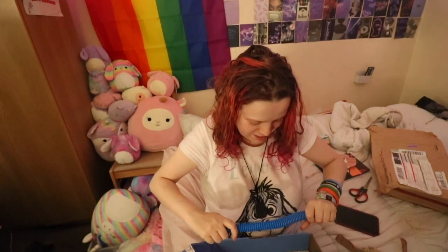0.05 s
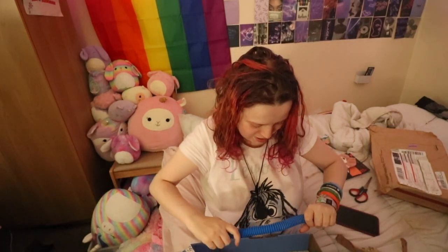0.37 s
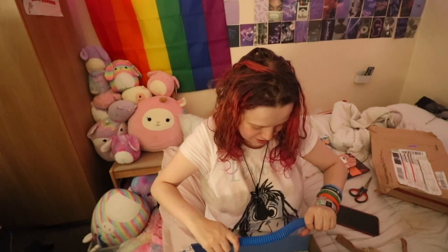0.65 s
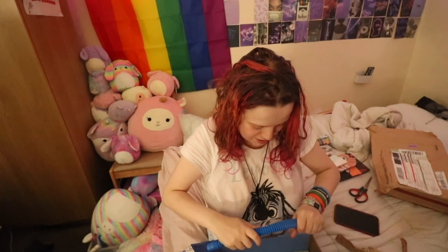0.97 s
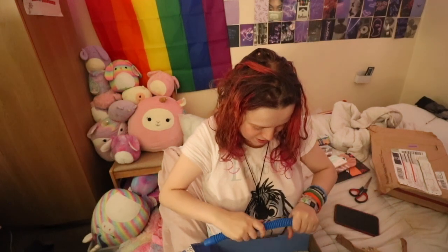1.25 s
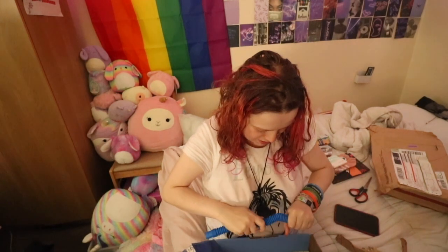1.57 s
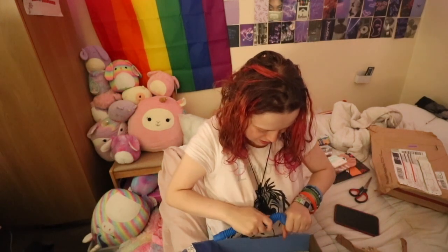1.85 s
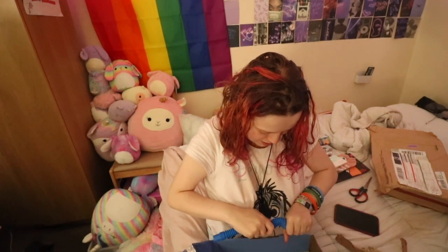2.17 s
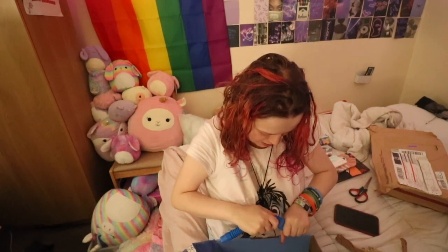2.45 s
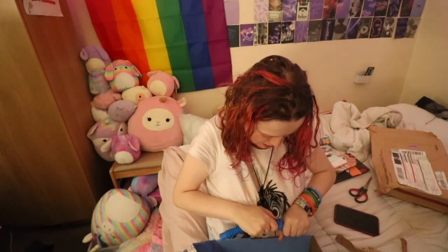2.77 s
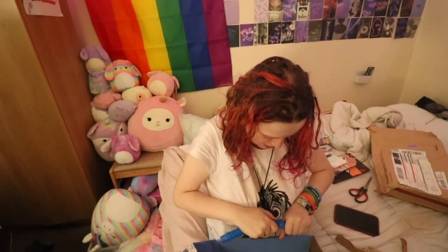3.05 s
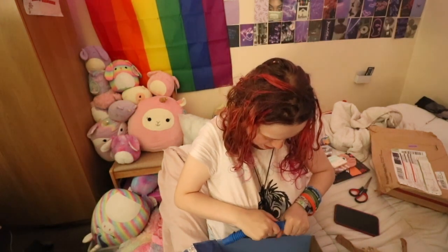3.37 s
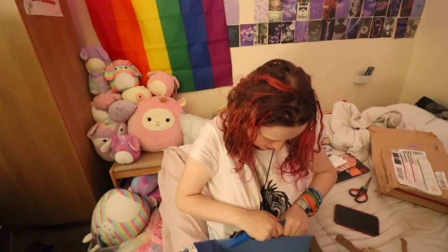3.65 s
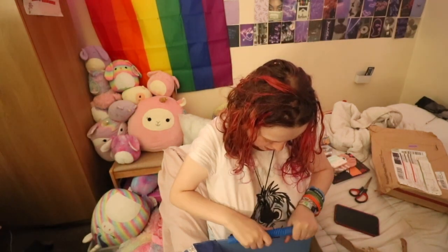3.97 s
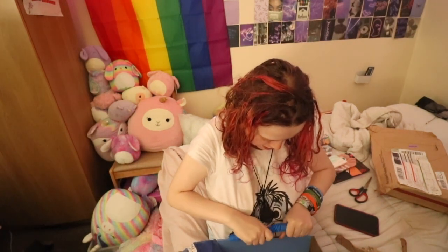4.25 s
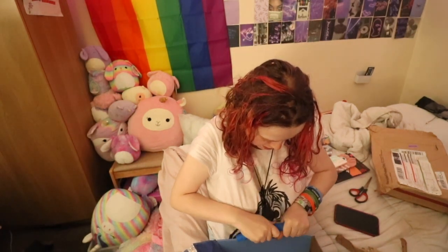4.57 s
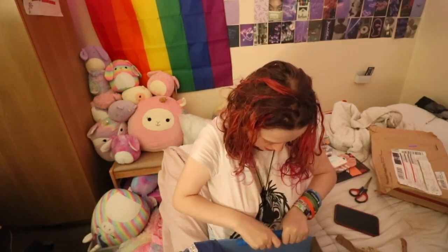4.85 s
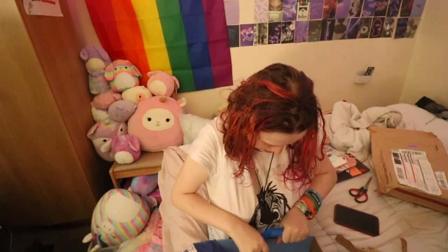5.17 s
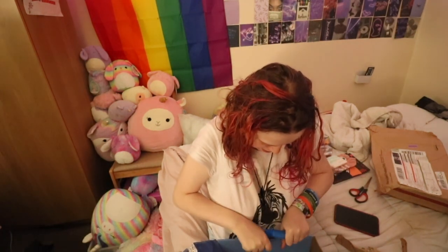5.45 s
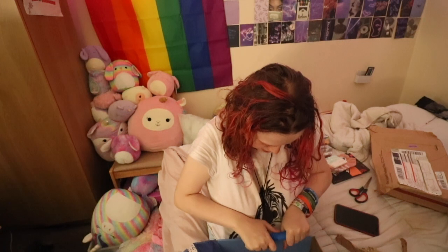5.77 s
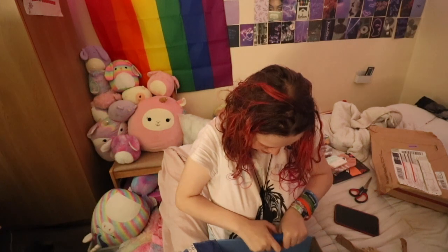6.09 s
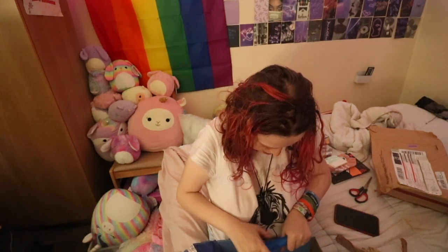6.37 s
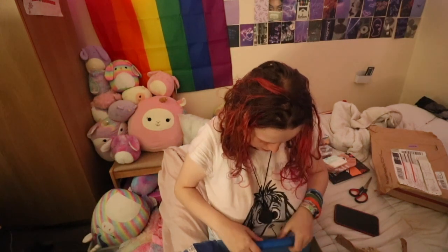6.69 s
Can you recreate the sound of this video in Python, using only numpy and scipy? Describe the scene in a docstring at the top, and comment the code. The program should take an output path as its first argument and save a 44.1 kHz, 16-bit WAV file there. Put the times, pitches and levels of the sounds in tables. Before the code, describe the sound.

Close, hollow plastic pops and clicks come in uneven bursts as a ribbed toy tube is squeezed shorter, over faint room noise.

```python
"""Sharp, hollow pops in quick runs: a ribbed plastic pop tube pushed together by hand in a small bedroom.
Each rib snaps over with a crack, rings the thin wall and thumps the air column, whose pitch climbs
as the tube shortens. Fingers slide on the plastic between pops. The tube is close and the room soft;
behind it lie room air, a deep rumble and a faint swell like far traffic."""
import sys
import numpy as np
from scipy import signal
from scipy.fft import rfft, irfft, next_fast_len
from scipy.io import wavfile

SR = 44100
rng = np.random.default_rng(int(sys.argv[2]) if len(sys.argv) > 2 else 0)


def unload_audio(sound):
    """Save the sound as a 16-bit wav file, at the path given as the first command line argument."""
    columns = np.transpose(np.atleast_2d(sound))
    # keep every value between -1 and 1, then stretch to whole-number steps
    steps = np.round(np.clip(columns, -1, 1) * 32767)
    wavfile.write(sys.argv[1], SR, steps.astype(np.int16))


N = 296528


def tube(into_room=False):
    """Ribs snap in turn; tube length sets the air pitch, the grip sets colour and aim."""
    # one rib a row: t/s, air thump/dB, wall ring/dB, crack/dB
    ribs = [(1.4346, -23.5, -29.5, -21.5), (1.4758, -19.5, -23.5, -18.5), (1.481, -24.5, -29.5, -27.5),
            (1.529, -22, -41, -31), (1.621, -26, -21, -22), (1.6728, -21.5, -50, -33),
            (1.687, -23, -49, -31.5), (1.7141, -24, -37, -31), (1.7349, -29, -33, -29),
            (1.753, -16, -29, -29), (1.766, -11.5, -37, -28), (1.7694, -21.5, -33, -46),
            (1.8224, -19.5, -58, -40.5), (2.2252, -17.5, -42, -40), (2.255, -25.5, -33, -35.5),
            (2.2827, -12.5, -26, -17), (2.2979, -12.5, -23.5, -30), (2.3261, -20, -31.5, -36),
            (2.4119, -19, -44.5, -36.5), (2.7427, -22.5, -25.5, -22.5), (2.9746, -26.5, -30, -27.5),
            (3.039, -25.5, -28, -37.5), (3.1634, -28.5, -29.5, -24), (3.1836, -22.5, -45, -57),
            (3.1887, -26, -29.5, -52), (3.2001, -27, -24, -48), (3.208, -22, -45, -39),
            (3.22, -27.5, -46, -43), (3.235, -26.5, -25.5, -31), (3.422, -29, -22.5, -28),
            (3.4858, -28, -25.5, -41), (3.5141, -22, -25, -39), (3.538, -29.5, -26, -32.5),
            (3.7248, -27, -24.5, -36), (4.2392, -20, -26, -30.5), (4.2892, -32, -72, -51),
            (4.3745, -23.5, -63, -35.5), (4.391, -23, -57, -45), (4.422, -26.5, -26.5, -24),
            (4.4351, -27, -65, -51), (4.5042, -17, -26, -23.5), (4.5064, -24, -32, -29),
            (4.524, -28, -39, -32), (4.5282, -17.5, -31, -29), (4.537, -19.5, -30, -24),
            (4.556, -25, -30, -30), (4.5625, -26.5, -32, -23.5), (4.5694, -27, -23, -26),
            (4.5841, -24, -22.5, -27.5), (4.5953, -21, -29, -31.5), (4.6265, -23, -32, -31.5),
            (4.6355, -22, -30.5, -36), (4.656, -27, -45, -49), (4.6686, -37, -38, -50),
            (4.6885, -21.5, -22, -20.5), (4.7096, -28, -18.5, -26.5), (4.7119, -23.5, -20, -32),
            (4.7243, -45, -26.5, -48), (5.195, -16.5, -25, -21), (5.2096, -15, -26.5, -35),
            (5.2223, -16.5, -31, -28.5), (5.2318, -13.5, -39, -36), (5.2397, -14.5, -34, -32.5),
            (5.2502, -16, -35, -39), (5.701, -32, -39, -40), (5.7302, -16.5, -21.5, -39),
            (5.734, -23.5, -32, -33), (5.7455, -32, -42, -56), (5.7992, -25.5, -27.5, -36),
            (5.8265, -33, -22, -26), (5.8323, -44, -27, -28), (5.8394, -28.5, -25, -39),
            (5.8532, -32, -30, -29), (5.8662, -19, -30, -29.5), (5.8726, -22, -27, -26),
            (5.8899, -14.5, -34, -28.5), (5.902, -40, -26, -40), (5.9166, -27, -31, -36.5),
            (5.9431, -23.5, -38, -43), (5.959, -33, -54, -55), (6.0507, -35.5, -44, -47.5)]
    # one grip a row: start t/s, wall f/Hz, crack f/Hz, knock offset/dB, fizz offset/dB, room send/dB
    grips = [(1.4, 1920, 5960, -12, -3, 3.5), (1.6, 2620, 5070, -10, 2.5, 4),
             (1.65, 1880, 4880, -7.5, -3.5, 4.5), (2.2, 2030, 5050, -12.5, -12, 2),
             (2.7, 2190, 5240, -8.5, -2.5, 2), (2.9, 2180, 3300, -9, -8.5, 1.5),
             (3.4, 2290, 2980, -14.5, -10.5, 1), (3.7, 2340, 4670, -14, -9, -0.5),
             (4.2, 2700, 3340, -13.5, -9, 2), (4.35, 1800, 4360, -9.5, -8, 1.5),
             (4.49, 1880, 5340, -9.5, -3, 3), (4.55, 1930, 3200, -9.5, -4.5, 3),
             (4.58, 2800, 4470, -10, -6, 2), (4.68, 2150, 4740, -17, 0.5, 0.5),
             (5.15, 2090, 5330, -14.5, -1, 4), (5.68, 1554, 3160, -14, -9.5, 1.5),
             (5.81, 2370, 3170, -13.5, -3.5, 4), (5.85, 1790, 5360, -12.5, -7.5, 0.5)]
    # air column pitch, rising as the tube shortens, sinking where it is let out: t/s, f/Hz
    air_pitch = [(1.43, 423.5), (1.75, 452.4), (2.28, 470), (2.74, 484), (3.45, 515), (3.72, 541),
                 (4.52, 567), (4.6, 628), (4.71, 647), (5.22, 612.5), (5.75, 635.5), (6.05, 676)]
    out = np.zeros(N)
    for t_s, thump_db, wall_db, crack_db in ribs:
        grip = max(sum(row[0] <= t_s for row in grips) - 1, 0)
        _, wall_hz, crack_hz, knock_db, fizz_db, send_db = grips[grip]
        air_hz = np.interp(t_s, *np.transpose(air_pitch))
        knock_db += .36 * wall_db + .24 * thump_db
        fizz_db += .76 * crack_db + .34 * thump_db
        snap_s = .0017 * np.exp(.23 * rng.standard_normal())  # fold's travel time round the rib
        crack_hz *= np.exp(.05 * rng.standard_normal())
        sound = pop(air_hz, thump_db, knock_db, wall_hz, wall_db, crack_hz, crack_db, fizz_db, snap_s)
        add(out, t_s, sound * gain_of(send_db if into_room else 0))
    return out


def pop(air_hz, thump_db, knock_db, wall_hz, wall_db, crack_hz, crack_db, fizz_db, snap_s):
    """One rib buckles and sets the wall and the air inside ringing."""
    # air column overtones: pitch ratio, level re snap at that frequency/dB, t60/s
    overtones = [(2.07, -8, 0.057), (3.13, -10.5, 0.024), (4.3, -8.5, 0.037), (5.4, -13.5, 0.03),
                 (6.6, -13.5, 0.041), (7.8, -19.5, 0.025)]
    fold = buckle(snap_s)
    hz = np.linspace(1, SR / 2, len(fold))
    rib_limit = resonance(hz, 10500, q=1.46) / (1j * hz)  # rib cannot follow above its top resonance
    crack_peak = resonance(hz, crack_hz, q=4.5) * resonance(hz, crack_hz, q=1)
    crack = transient(fold * crack_peak * rib_limit, crack_db)
    # tiny creases at the fold's edge fizz a little longer; two resonances in antiphase
    creases = buckle(snap_s * 1.12)
    shimmer = resonance(hz, 14100, q=2.2) - 2 * resonance(hz, 7770, q=9.1)
    fizz = transient(creases * shimmer * high_pass(hz, 8100), fizz_db)
    knock = transient(fold * resonance(hz, 1188, q=1) ** 2 * high_pass(hz, 250), knock_db)
    wall_t60_s = np.interp(wall_db - crack_db, [0, 9], [.005, .016])  # dull snaps ring longer
    wall = transient(fold * ring(hz, wall_hz, wall_t60_s) * resonance(hz, wall_hz, q=1), wall_db - 3.5)
    # the volume step thumps the air column; open ends radiate little bass
    push = high_pass(hz, 350) / (1 + 1j * hz / 1500) ** 2
    air = transient(push * ring(hz, air_hz, t60_s=.046), thump_db - .8)
    snap_colour = [(1100, knock_db), (2200, wall_db), (5000, crack_db)]
    for ratio, db, t60_s in overtones:
        tone_hz = air_hz * ratio * rng.uniform(.94, 1.01)
        tone = fold * ring(hz, tone_hz, t60_s) * resonance(hz, tone_hz, q=1)
        air += transient(tone, interp_log_f(snap_colour, tone_hz) + db)
    return crack + fizz + knock + wall + air


def buckle(snap_s, size=2304):
    """Force spectrum of a fold running round a rib: a short, ragged, nearly white burst."""
    t_s = np.arange(size) / SR
    envelope = (1 - np.exp(-t_s / .00008)) * np.exp(-(t_s / snap_s) ** 2)
    ragged = rfft(rng.standard_normal(size) * envelope)
    whitened = irfft(ragged / abs(ragged))
    return rfft(whitened * np.sqrt(envelope))


def fingers():
    """Skin slides over plastic with a faint, grainy hiss and squeaks once."""
    # finger slides: start t/s, length/s, level/dB
    slides = [(0.697, 0.13, -55), (0.805, 0.18, -54.5), (1.004, 0.21, -55.5), (2.06, 0.31, -60),
              (3.815, 0.24, -55), (4.878, 0.2, -56.5)]
    # friction spectrum: f/Hz, level/dB
    slide_colour = [(1500, -14), (3000, -2), (4300, -3.5), (5500, 1.5), (8000, -1), (13000, -3),
                    (16000, -6)]
    out = np.zeros(N)
    for t_s, length_s, db in slides:
        size = round(length_s * SR)
        grain = gain_of(2 * noise([(30, -2), (150, -6), (600, -50)], size))
        hiss = noise(slide_colour, size) * grain
        add(out, t_s, gain_of(db) * hiss * signal.windows.tukey(size, .7))
    start_s, squeak_s, squeak_hz, squeak_db = .762, .022, 4220, -50
    squeak = band(rng.standard_normal(round(squeak_s * SR)), squeak_hz - 150, squeak_hz + 150)
    add(out, start_s, gain_of(squeak_db) * squeak / squeak.std() * np.hanning(len(squeak)))
    return out


def reflections(x):
    """Close surfaces throw back mids and treble."""
    # echoes off lap, body and wall: delay/s, level/dB
    echoes = [(.0027, -18), (.0056, -24), (.0079, -22), (.0105, -29.5), (0.0154, -23.5), (.0183, -23)]
    out = np.zeros(N)
    bright = band(x, 1600, 12000, order=1)
    for delay_s, db in echoes:
        add(out, delay_s, gain_of(db) * bright)
    return out


def room_tail(x):
    """Sparse random reflections; each band decays at its own rate."""
    # tail decay: f/Hz, t60/s
    tail_t60 = [(350, 0.054), (600, 0.23), (1700, 0.24), (5000, 0.34), (12000, 0.26)]
    # tail gain: f/Hz, level/dB
    tail_colour = [(200, 4.5), (500, -8), (1000, -10), (1600, -7), (2300, -12), (4000, -11.5),
                   (6500, -10.5), (11000, -7), (16000, -15)]
    size, taps_per_s = SR // 2, 4000
    taps = rng.choice([-1., 1.], size) * (rng.random(size) < taps_per_s / SR)
    taps *= np.clip((np.arange(size) / SR - .003) / .0029, 0, 1)  # 3 ms gap, then fade-in
    hz, t_s, bands = signal.stft(taps, SR, nperseg=256)
    decay = gain_of(-60 * t_s / interp_log_f(tail_t60, hz)[:, None])
    energy = (decay ** 2).mean(1, keepdims=True) * np.sum(taps ** 2)
    gain = gain_of(interp_log_f(tail_colour, hz))[:, None] / np.sqrt(energy)
    _, response = signal.istft(bands * decay * gain, SR, nperseg=256)
    return signal.fftconvolve(x, response)[:N]


def background():
    """Steady room air, building rumble and a swell like far traffic with a thin whine in it."""
    # room air spectrum: f/Hz, level/dB
    air_colour = [(18, -7), (45, -6.5), (70, -4), (100, -12), (135, -3.5), (196, 1), (300, -3), (450, -2),
                  (850, -5), (1200, -8.5), (2000, -16), (3500, -22), (7000, -27), (16000, -29)]
    # building rumble: t/s, level/dB
    rumble_level = [(0, -60), (1.15, -56.5), (1.5, -66), (2.3, -57), (3.3, -62), (4.65, -61), (5.1, -50),
                    (5.6, -58), (6.72, -62)]
    # traffic swell: t/s, level/dB
    traffic_level = [(0, -90), (2.8, -63), (3.6, -51.5), (5.5, -46.5), (6.72, -49.5)]
    # traffic spectrum: f/Hz, level/dB
    traffic_colour = [(40, -12), (100, -17), (170, 5), (300, 3), (600, 0.5), (1200, -3), (2000, -7.5),
                      (3500, -14), (7000, -19.5), (14000, -35)]
    rumble_colour = [(12, -35.5), (24, -10), (29, 3), (35, -14), (55, -32), (200, -90)]  # f/Hz, level/dB
    air = gain_of(-47) * noise(air_colour, N)
    rumble = gain_curve(rumble_level) * noise(rumble_colour, N)
    traffic = gain_curve(traffic_level) * noise(traffic_colour, N)
    peak_db, peak_s, half_width_s = -55.5, 4.9, 1
    whine_gain = gain_of(peak_db) / (1 + ((np.arange(N) / SR - peak_s) / half_width_s) ** 2)
    whine = band(rng.standard_normal(N), 1184, 1196)
    return air + rumble + traffic + whine_gain * whine / whine.std()


def transient(spectrum, db):
    """Waveform of a spectrum, with rms level db over its first 5 ms."""
    x = irfft(spectrum)
    return gain_of(db) * x / np.sqrt(np.mean(x[:round(.005 * SR)] ** 2) + 1e-20)


def resonance(hz, centre_hz, q):
    """Complex response of one resonance, gain 1 at centre."""
    return 1 / (1 + 1j * q * (hz / centre_hz - centre_hz / hz))


def ring(hz, centre_hz, t60_s):
    """Resonance set by its decay time."""
    return resonance(hz, centre_hz, np.pi * centre_hz * t60_s / np.log(1000))


def high_pass(hz, edge_hz):
    """Complex response of a second-order high-pass."""
    s = 1j * hz / edge_hz
    return s ** 2 / (1 + np.sqrt(2) * s + s ** 2)


def band(x, lo_hz, hi_hz, order=2):
    """Causal band-pass."""
    return signal.sosfilt(signal.butter(order, [lo_hz, hi_hz], "band", fs=SR, output="sos"), x)


def noise(colour, size):
    """Unit-rms noise; colour rows: f/Hz, level/dB."""
    padded = next_fast_len(size, real=True)
    gain = gain_of(interp_log_f(colour, np.fft.rfftfreq(padded, 1 / SR)))
    x = irfft(rfft(rng.standard_normal(padded)) * gain, padded)[:size]
    return x / x.std()


def interp_log_f(points, hz):
    """Interpolates (f/Hz, value) rows over log frequency."""
    points_hz, values = np.transpose(points)
    return np.interp(np.log(hz + 1), np.log(points_hz + 1), values)


def gain_of(db):
    """dB to gain."""
    return 10 ** (np.asarray(db) / 20)


def gain_curve(points):
    """Gain per sample from (t/s, level/dB) rows."""
    return gain_of(np.interp(np.arange(N) / SR, *np.transpose(points)))


def add(mix, t_s, sound):
    """Mixes a sound in at t_s."""
    part = mix[round(t_s * SR):][:len(sound)]
    part += sound[:len(part)]


def scene():
    """Direct sound, reflections, tail and background, alike in both channels."""
    direct = tube() + fingers()
    tail = room_tail(tube(into_room=True))  # each direction has its own fine detail
    mono = direct + reflections(direct) + tail + background()
    return np.array([mono, mono])


def record(dry):
    """Faint hiss per channel, clipping at full scale, band limit."""
    hiss_db, edge_hz = -72.5, 16200
    clipped = np.clip(dry + gain_of(hiss_db) * rng.standard_normal(dry.shape), -1, 1)
    low_pass = signal.firwin(255, edge_hz, window=("kaiser", 9), fs=SR)
    return signal.oaconvolve(clipped, low_pass[None], "same")


dry = scene()
out = record(dry)
unload_audio(out)
```